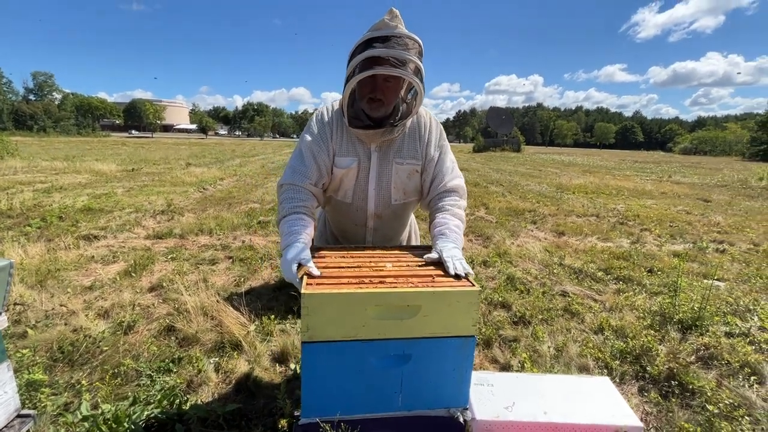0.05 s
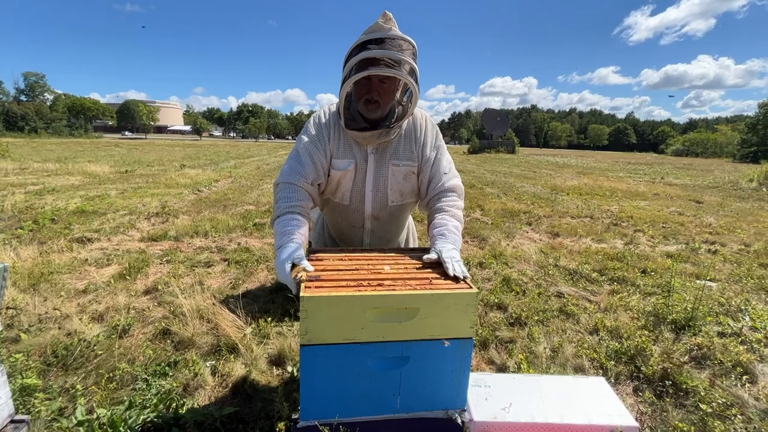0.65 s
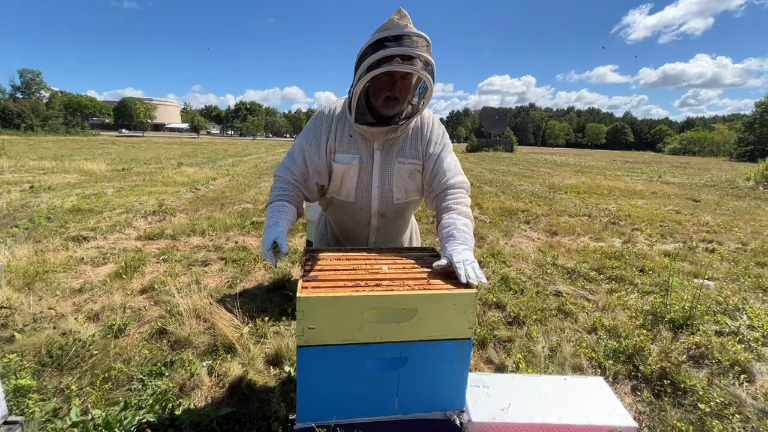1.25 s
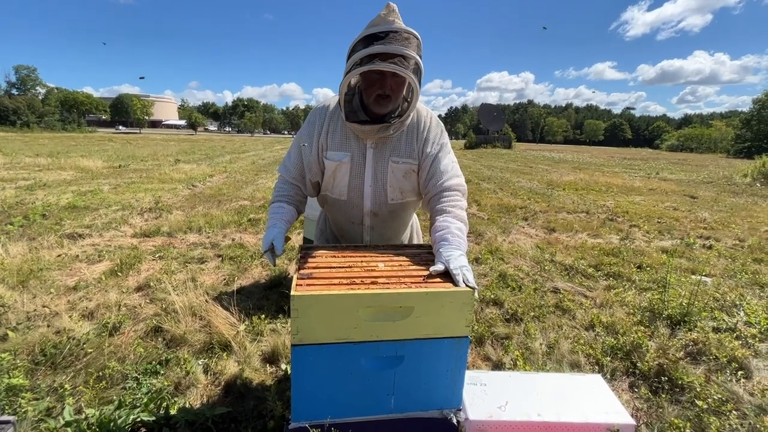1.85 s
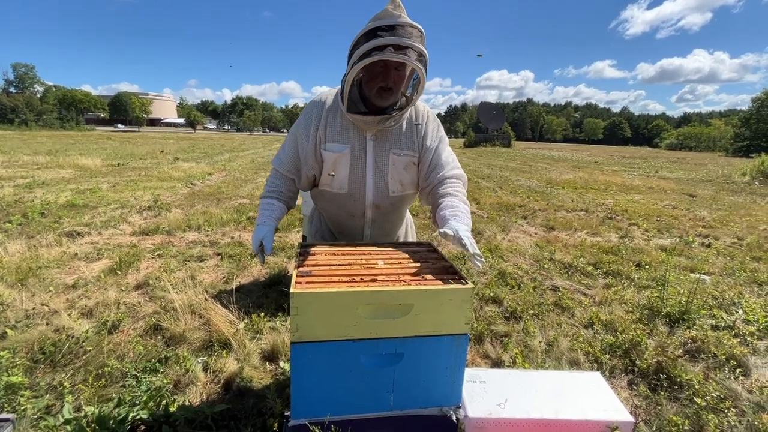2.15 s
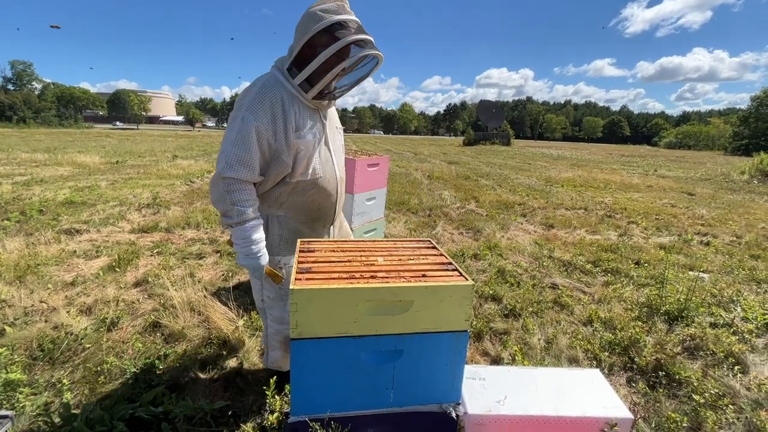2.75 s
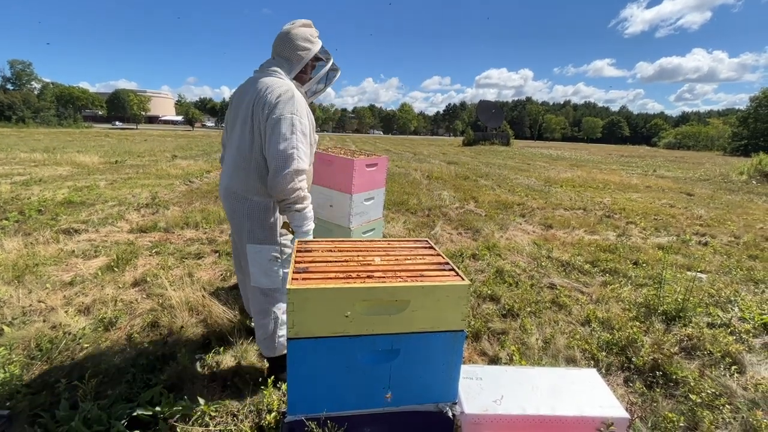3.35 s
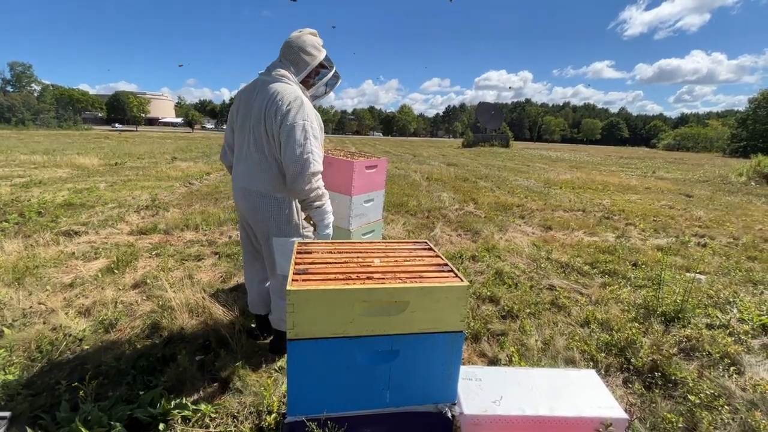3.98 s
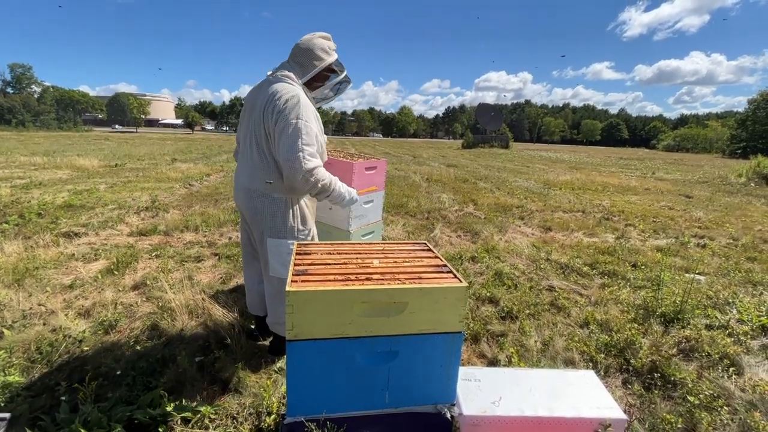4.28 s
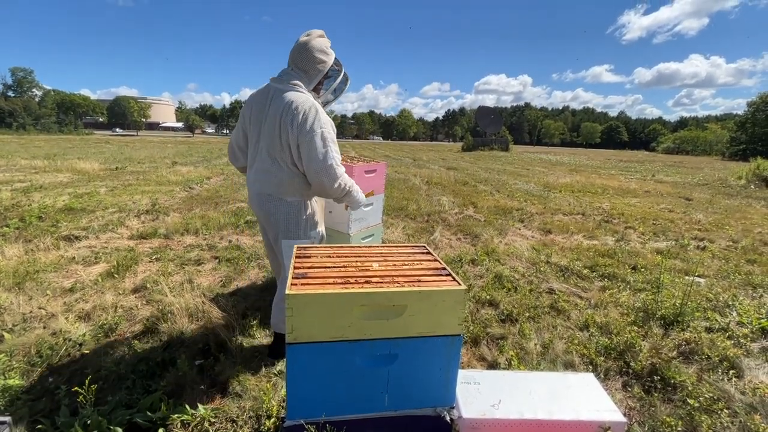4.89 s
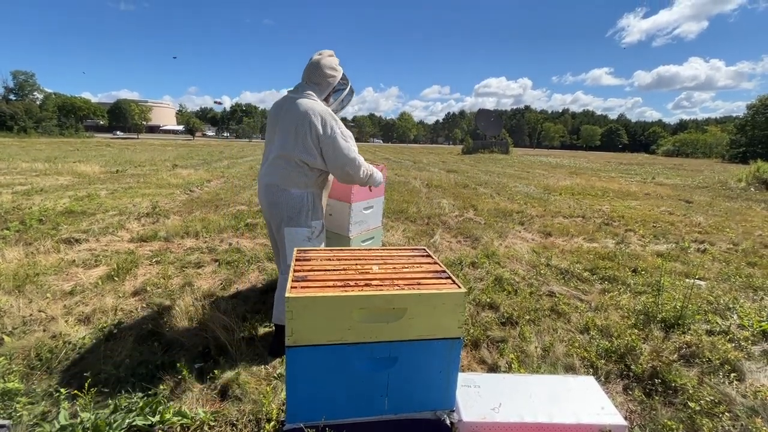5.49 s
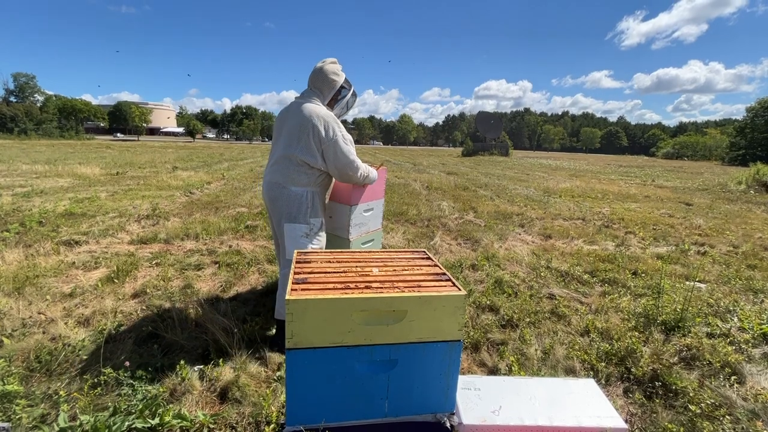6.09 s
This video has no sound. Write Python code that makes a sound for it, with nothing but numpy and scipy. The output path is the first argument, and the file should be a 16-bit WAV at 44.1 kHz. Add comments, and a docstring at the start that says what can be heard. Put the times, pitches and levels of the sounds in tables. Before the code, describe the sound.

In an open field, crickets chirp and trill over the low rumble of distant traffic and a faint hum of bees. Two soft wooden knocks come at the start. Past the middle, a heavy hive box clunks hard, briefly overloading the stereo microphone, and a lighter box bumps several times. A few faint dry scrapes follow, with cloth and grass rustling very quietly throughout.

```python
"""A summer hayfield beside open beehives. From the start far traffic rumbles and drones, crickets
scrape their wings in chirps and trills, bees hum and the beekeeper's suit rustles. Two soft knocks
ring a wooden hive box, stems snap, and a cicada's whine sinks and fades. The keeper walks through the
grass; a small bird chips while a heavy box is knocked, once hard enough to overload the two-port
microphone. A light box is knocked as a far truck nears and eases off, and a few dry scrapes follow."""
import sys
import numpy as np
from scipy import signal
from scipy.fft import rfft, irfft, next_fast_len
from scipy.io import wavfile
from scipy.ndimage import uniform_filter1d

SR = 44100
rng = np.random.default_rng(int(sys.argv[2]) if len(sys.argv) > 2 else 0)


def master(y):
    """Save y as 16-bit WAV."""
    cut = np.clip(np.atleast_2d(y).T, -1, 1)
    pcm = np.round(cut * 32767)  # scale
    wavfile.write(sys.argv[1], SR, pcm.astype(np.int16))


N = 274743
T = np.arange(N) / SR
PORT_LAG_S = 0.00046  # delay between the ports for a sound from one side

# spectrum of traffic and air over the field: frequency_hz, relative_db
AIR_SPECTRUM = [(15, -42), (25, -43), (43, -3), (96, -1.5), (118, -8.5), (140, -12), (209, -18),
                (292, -20.5), (332, -15.5), (427, -17.5), (561, -25), (1010, -23), (1330, -31), (1640, -32),
                (3800, -44.5), (4940, -57), (8360, -120)]
# two far engines at steady speed: pitch_hz, relative_db, fade_db_per_s
ENGINE_TONES = [(56.4, -2.5, 0.82), (106.2, -3, 1.5)]
# their joint envelope: time_s, level_db
ENGINE_ENVELOPE = [(0.0, -31), (0.25, -31), (0.44, -43), (1.8, -28), (1.86, -50), (2.11, -35.5),
                   (2.89, -27), (3.12, -33), (3.3, -27), (3.6, -28), (3.69, -37), (3.82, -28.5),
                   (4.6, -30.5), (5.6, -28)]
# blurred high cricket chorus, filtered off steeply above 9.1 kHz: frequency_hz, relative_db
CHORUS_FILTER = [(5000, -51), (7000, -21), (7700, -9.5), (8200, -9.5), (8550, -6.5), (8900, -6),
                 (9100, -7.5), (9300, -56), (10000, -70)]
# trilling ground crickets:
# stroke_rate_hz, rate_waver_share, pitch_hz, fall_share, sounding_share, level_db, pan_db, left_lag_s
TRILLS = [(19.3, .008, 8650, .05, .52, -51, 11, -0.0038), (17.72, .03, 8350, .15, .48, -53.5, 9.5, .00002),
          (16.92, .03, 8500, .06, .55, -54.5, -11, -.00003),
          (18.7, 0.0299, 8650, .07, .55, -55.5, -11, 0.009),
          (21.2, 0.0199, 8600, 0.043, 0.5, -51, 3, .00004)]
# partials of the cicada's whine: offset_hz, relative_db
CICADA_PARTIALS = [(-400, -4), (-205, -10), (-20.5, -2.5), (194.5, -5), (370, -4)]
# spectrum of rubbing cloth and dry grass: frequency_hz, relative_db
RUSTLE_SPECTRUM = [(1500, -10), (3000, -5), (6000, -3), (10000, 5), (11200, -3.5), (13300, 2), (14200, -5),
                   (14700, -45)]
# swishes of a sleeve or a boot: peak_s, half_length_s, level_db
SWISHES = [(0.48, 0.042, -55), (2.263, 0.052, -56), (2.801, .04, -57), (3.09, 0.035, -53), (3.56, .09, -56),
           (5.11, 0.041, -56)]
# chirps of the near, the far and the lower-pitched field crickets: time_s, level_db, first_stroke_db
NEAR_CHIRPS = [(0.0977, -35, 1), (0.4, -37.5, -8), (0.7529, -34.5, 0), (1.1758, -36.5, 0), (1.4013, -36, 2),
               (1.6701, -34.5, 0.5), (1.9504, -33, -1), (2.2648, -35, -1), (2.5525, -37, -2),
               (2.8575, -38, -7), (3.1024, -38, -3)]
FAR_CHIRPS = [(.2, -52.5, 0), (.785, -49, 0), (1.57, -50, -2), (2.01, -51, 0), (3.44, -54, 0),
              (3.775, -59, -2), (4.28, -58, 0.5), (4.74, -56, -1), (5.08, -54, -2), (5.39, -54, 0),
              (5.57, -58, 0), (5.785, -51.5, 1), (6.06, -58, -2), (6.19, -49, -2)]
LOW_CHIRPS = [(0.4183, -35, 0), (1.0318, -33, 0.5), (1.7725, -34.5, 0), (2.456, -35, 0.5),
              (3.1257, -35, -3), (4.0435, -38, -5), (4.9944, -41, -10), (5.6144, -41, 2.5),
              (6.2058, -38, -1)]
# wing strokes within each of their chirps: offset_s, length_s, pitch_hz, fall_share, relative_db
NEAR_STROKES = [(-.039, 0.016, 5020, .06, -6), (-.012, 0.0245, 5300, 0.13, 0),
                (0.024, 0.0255, 5300, 0.13, 1)]
FAR_STROKES = [(-.03, .024, 5060, .04, -4), (.005, .026, 5130, .04, 1), (0.034, .026, 5150, .04, 1),
               (0.071, .026, 5150, .04, -5.5)]
LOW_STROKES = [(-.069, 0.022, 4350, 0.025, -6.5), (-.024, 0.035, 4520, 0.035, 0)]
# knocks on the hive boxes: start_s, level_db, brightness_hz, rocking_t60_s, box_name
KNOCKS = [(.098, -22, 150, .12, "light"), (.226, -25, 130, .1, "light"), (2.763, -21.5, 170, 0.3, "heavy"),
          (3.379, -17, 170, 0.2, "heavy"), (3.46, -22, 2500, 0.1, "heavy"),
          (3.4661, -1.5, 870, 0.25, "heavy"), (3.4708, -1.2, 775, 0.23, "heavy"),
          (3.4782, 6, 450, 0.15, "heavy"), (3.5099, -13.5, 165, 0.1, "heavy"),
          (3.5276, -9, 280, 0.1, "heavy"), (3.5555, -13.5, 138, 0.07, "heavy"),
          (3.603, -15, 143, .04, "heavy"), (3.6351, -19, 84, 0.3, "heavy"), (4.092, -27, 200, 0.3, "light"),
          (4.231, -13, 357, 0.4, "light"), (4.255, -13, 150, 0.23, "light"),
          (4.280, -17, 158, 0.1, "light"), (4.340, -20.5, 193, 0.48, "light"),
          (4.478, -18.5, 780, 0.37, "light"), (4.490, -15.5, 204, 0.3, "light")]
# normal modes of the heavy and the light box: frequency_hz, relative_db, t60_s
BOX_MODES = {"heavy": [(101.5, -4.5, 0.13), (129.5, -10, 0.21), (153, -12, 0.13), (202.2, 3.5, 0.14),
             (280, 5.5, 0.059), (377.5, -6.5, 0.058), (444, -4.5, 0.12), (530, -10.5, 0.072),
             (608, -6.5, .06), (679, -4, .055), (710, -5, 0.069), (842, -10, 0.06), (1120, -7, 0.061)],
             "light": [(128, -2.5, 0.14), (167, -4.5, .083), (202, 6, 0.096), (289, 0, 0.095),
             (381, -7, 0.076), (447, -0.3, .07), (500, -6, 0.054), (678, -4, 0.058)]}
# snaps and scrapes of stems and wood: start_s, level_db, centre_hz, width_octaves, t60_s
SNAPS = [(.509, -47, 13800, .35, .016), (.5145, -48, 13800, .35, .014), (2.763, -53, 5500, 1.5, .22),
         (3.461, -25.5, 880, 1.2, 0.1), (3.466, -39.5, 2950, 1.55, 0.12), (3.476, -23.5, 566, 1.6, 0.12),
         (3.478, -34, 2390, 2.3, 0.039), (3.531, -45.5, 2560, 1.4, 0.12), (4.0135, -47, 13800, .35, .018),
         (4.6, -53, 1800, 1.2, .3), (4.89, -54, 1800, 1.2, 0.44), (4.96, -46, 1640, .8, 0.24),
         (5.08, -52, 1700, 1.0, .3), (5.21, -53, 2010, 0.93, 0.56), (5.1, -56, 4500, 1.6, .28)]
# the bird's falling chips: start_s, length_s, pitch_hz, fall_share, level_db
BIRD_CHIPS = [(3.347, 0.041, 4000, 0.25, -56), (3.488, .034, 5320, 0.18, -52),
              (3.512, 0.035, 3650, 0.24, -55), (3.649, .04, 4040, 0.28, -58.5),
              (3.775, 0.037, 3970, 0.23, -57)]


def undb(db):
    """Amplitude ratio of a level in decibels."""
    return np.exp(np.asarray(db) * (np.log(10) / 20))


def level(x, db):
    """Normalisation to an rms level."""
    return x * undb(db) / np.sqrt(np.mean(x ** 2))


def sine(hz):
    """Oscillation whose phase is the integral of its frequency."""
    return np.sin(2 * np.pi * np.cumsum(hz) / SR)


def wander(rate_hz):
    """Smoothed random steps for slow or fast modulation, with a spread near 1."""
    hold = int(SR / rate_hz)
    steps = np.repeat(rng.standard_normal(N // hold + 1), hold)
    return 1.3 * uniform_filter1d(uniform_filter1d(steps, hold), hold)[:N]


def colour(x, points):
    """Spectral shaping by points of frequency_hz, gain_db."""
    hz, db = np.transpose(points)
    size = next_fast_len(N)
    bins_hz = np.fft.rfftfreq(size, 1 / SR)
    gain = undb(np.interp(np.log(bins_hz + 1), np.log(hz), db))
    return irfft(rfft(x, size) * gain, size)[..., :N]


def balance(pan_db):
    """Level difference: port gains with the left pan_db above the right."""
    return undb(np.array([[1], [-1]]) * pan_db / 2)


def place(x, pan_db, lag_s=0):
    """Direction as level and time differences: the left port hears the sound lag_s later."""
    return np.array([np.interp(T - lag_s, T, x), x]) * balance(pan_db)


def add(track, start_s, sound):
    """Superposition of a sound on a track."""
    i = max(int(start_s * SR), 0)
    track[..., i:i + sound.shape[-1]] += sound[..., :max(N - i, 0)]


def scatter(x, wet_db, t60_s):
    """Scattering by stems and ground gives a short diffuse tail, different at each port."""
    t = T[:SR // 4]
    tail = rng.standard_normal((2, len(t))) * undb(-60 * t / t60_s)
    tail /= np.linalg.norm(tail[0])
    return undb(wet_db) * signal.fftconvolve(x[None], tail, axes=1)[:, :N]


def air(level_db=-33, swell_db=0.62, fade_db_per_s=0.2262):
    """Direct and diffuse fields: receding traffic rumbles on the right; its treble flickers all round."""
    road = place(rng.standard_normal(N), pan_db=-1, lag_s=PORT_LAG_S)
    road = colour(road, [(40, -7.5), (110, -3.5), (180, -1), (600, -2), (1500, -3), (3500, -26)])
    flicker = undb(.7 * wander(20))
    diffuse = rng.standard_normal((2, N)) * balance(4) * flicker
    diffuse = colour(diffuse, [(50, -6), (100, -10), (250, -10), (900, -1), (3500, 0)])
    rumble = level(colour(road + diffuse, AIR_SPECTRUM), level_db)
    return rumble * undb(swell_db * wander(3.16) - fade_db_per_s * T)


def exhaust(hz, db, flutter_db=1.5, waver_share=0.0119):
    """Periodic firing makes a tone, modulated by the moving air on its long path."""
    amplitude = np.sqrt(2) * undb(db + flutter_db * wander(9))
    return amplitude * sine(hz * (1 + waver_share * wander(10)))


def engines():
    """Common amplitude modulation: two drones swell and dip together, fading as they move off."""
    hum_db = np.interp(T, *np.transpose(ENGINE_ENVELOPE))
    return sum(exhaust(hz, hum_db + db - fade * T) for hz, db, fade in ENGINE_TONES)


def meadow(level_db=-56.5, pan_db=5, swell_db=1.55):
    """Incoherent sources, distant insects and leaves, sum to a smooth hiss."""
    spectrum = [(1500, -6), (3000, 5.5), (5000, 19.5), (7200, 7.5), (9000, -9), (11000, -28)]
    hiss = level(colour(rng.standard_normal((2, N)), spectrum), level_db)
    return hiss * undb(swell_db * wander(3)) * balance(pan_db)


def ground_crickets(chorus_db=-47, rough_hz=80, waver_hz=80, fade_db_per_s=0.29):
    """Continuous stridulation: trains of falling wing strokes waver over a blurred, filtered chorus."""
    out = level(colour(rng.standard_normal((2, N)), CHORUS_FILTER), chorus_db) * balance(3)
    for rate_hz, unsteady, hz, fall, sounding, db, pan_db, lag_s in TRILLS:
        cycles = np.cumsum(rate_hz * (1 + unsteady * wander(4))) / SR
        progress = np.minimum(cycles % 1 / sounding, 1)
        pitch = hz * (1 - fall * progress ** 2.8) + rough_hz * wander(900) + waver_hz * wander(25)
        trill = np.sin(np.pi * progress ** 1.33) * sine(pitch)
        flutter_db = 0.6 * wander(11) + 1.1 * wander(250)
        trill = level(trill * undb(flutter_db), db)
        out += place(trill, pan_db, lag_s) + scatter(trill, wet_db=-9, t60_s=0.26)
    return out * undb(-fade_db_per_s * (T - T.mean()))


def since(time_s):
    """Seconds elapsed after time_s, zero before it."""
    return np.maximum(T - time_s, 0)


def cicada(pitch_hz=6830, level_db=-57, sag_hz_per_s=330, fray_hz_per_s=110, fade_db_per_s=9):
    """Random frequency modulation broadens a far whine, which sinks, frays and fades as it runs down."""
    sinking_s = since(.55)
    hz = pitch_hz - sag_hz_per_s * sinking_s
    rough_hz = 55 + fray_hz_per_s * sinking_s
    whine = 0
    for offset_hz, db in CICADA_PARTIALS:
        whine += undb(db + 1.7 * wander(89.6)) * sine(hz + offset_hz + rough_hz * wander(400))
    return place(level(whine, level_db) * undb(-fade_db_per_s * since(0.69)), pan_db=4)


def bees(count=7, wing_hz=215, level_db=-47, slope_db_per_octave=-7):
    """Periodic wingbeats give each bee a wavering harmonic series that swells as it flies nearer."""
    cycle = np.linspace(0, 1, 256)
    wingbeat = sum(undb(slope_db_per_octave * np.log2(k)) * np.sin(2 * np.pi * k * cycle)
                   for k in range(1, 10))
    out = 0
    for offset, side in zip(np.linspace(-1, 1, count), rng.standard_normal(count)):
        hz = wing_hz * (1 + .12 * offset + .025 * wander(3) + 0.01002 * wander(25))
        buzz = np.interp(np.cumsum(hz) / SR % 1, cycle, wingbeat) * undb(3 * wander(3.07))
        out += place(buzz, 3 * side, PORT_LAG_S * side)
    return level(out, level_db)


def rustle(rest_db=-63, walk_db=-58.5, walk_from_s=1.8, walk_to_s=5.46, ramp_s=0.61, grain_db=3):
    """Friction of cloth and dry stems makes a fine crackle; walking and swishes add in power."""
    walking = np.clip(np.minimum(T - walk_from_s, walk_to_s - T) / ramp_s + .5, 0, 1)
    power = undb(rest_db + (walk_db - rest_db) * walking + 1.2 * wander(8.2)) ** 2
    for peak_s, half_s, db in SWISHES:
        power += undb(db) ** 2 * np.exp(-((T - peak_s) / half_s) ** 2)
    crackle = rng.standard_normal(N) * undb(grain_db * wander(700))
    diffuse = 0.88 * rng.standard_normal((2, N))
    return level(colour(crackle + diffuse, RUSTLE_SPECTRUM), 0) * np.sqrt(power)


def glide(length_s, hz, fall, bend=3.83, swell=1.9, rise=0.047):
    """A frequency-modulated note that swells and stops; rise and fall are shares of its pitch."""
    progress = np.linspace(0, 1, int(length_s * SR))
    pitch = hz * (1 - rise * (1 - progress) ** 4 - fall * progress ** bend)
    envelope = np.abs(np.sin(np.pi * progress ** swell)) ** .7
    return envelope * sine(pitch)


def field_cricket(chirps, strokes, pan_db, wet_db, rough_db, lag_s=0, judder=0, judder_hz=110):
    """Stridulation: a scraper crosses the wing's file, catches unevenly, may judder, and slows."""
    out = np.zeros(N)
    for time_s, chirp_db, first_db in chirps:
        for k, (offset_s, length_s, hz, fall, stroke_db) in enumerate(strokes):
            force, detune = rng.standard_normal(2)
            gain = undb(chirp_db + stroke_db + first_db * (k == 0) + 0.61 * force)
            add(out, time_s + offset_s, gain * glide(length_s, hz * (1 + 0.0025 * detune), fall))
    out *= 1 + judder * sine(judder_hz * (1 + .25 * wander(100)))
    out *= undb(rough_db * wander(350))
    return (place(out, 0, lag_s) + scatter(out, wet_db, t60_s=0.15)) * balance(pan_db)


def contacts(count=6, first_gap_s=.026, gap_share=0.95, soften_share=0.88, jitter_s=.001, floor_db=-32):
    """Inelastic rebound: a knocked box rocks in ever quicker, weaker and softer contacts."""
    k = np.arange(count)
    rows = []
    for start_s, db, bright_hz, t60_s, box in KNOCKS:
        gaps_s = first_gap_s * gap_share ** k + jitter_s * rng.standard_normal(count)
        after_s = np.cumsum(gaps_s) - gaps_s
        levels_db = db - 60 * after_s / t60_s
        rows += zip(start_s + after_s, levels_db, bright_hz * soften_share ** k, [box] * count)
    return [row for row in rows if row[1] > floor_db]


def hive_boxes(rattle_db=-17, rattle_t60_s=0.31, crack_db=-39, crack_t60_s=0.3, vary_db=1.5):
    """Modal resonance: each contact rings a box; loose frames rattle and the wood cracks faintly."""
    t = T[:SR // 3]
    radiation = signal.butter(4, 82, "high", fs=SR, output="sos")  # small walls radiate no deep bass
    dulling = signal.butter(1, 1500, fs=SR, output="sos")
    out = np.zeros(N)
    for start_s, db, bright_hz, box in contacts():
        rattle, crack, mode_mix = rng.standard_normal((3, len(t)))
        ring = sum(undb(mode_db + vary_db * chance - 60 * t / t60_s) * np.sin(2 * np.pi * hz * t)
                   for (hz, mode_db, t60_s), chance in zip(BOX_MODES[box], mode_mix))
        push = t * np.exp(-2 * np.pi * bright_hz * t)  # a softer contact pushes for longer
        rattle *= undb(-60 * t / rattle_t60_s)
        rattle /= np.linalg.norm(rattle)
        force = push + undb(rattle_db) * signal.fftconvolve(push, rattle)[:len(t)]
        body = signal.fftconvolve(force, signal.sosfilt(radiation, ring))[:len(t)]
        crack = signal.sosfilt(dulling, crack) * undb(crack_db - 60 * t / crack_t60_s)
        add(out, start_s, undb(db) * (body / np.abs(body).max() + crack))
    return place(out, pan_db=-0.6, lag_s=0.0005)


def snaps():
    """Damped transients: stems and wood give bursts of band noise, from crisp ticks to broad scrapes."""
    t = T[:SR // 5]
    out = np.zeros(N)
    for start_s, db, hz, octaves, t60_s in SNAPS:
        edge_ratio = 2 ** (octaves / 2)
        edges_hz = [hz / edge_ratio, min(hz * edge_ratio, SR * .4)]
        band = signal.butter(4, edges_hz, "band", fs=SR, output="sos")
        noise = signal.sosfilt(band, rng.standard_normal(len(t)))
        add(out, start_s, level(noise, db) * undb(-60 * t / t60_s))
    return place(out, pan_db=2)


def bird():
    """Downward frequency sweeps: quick, rough chips from overhead, with their scattered sound."""
    out = np.zeros(N)
    for start_s, length_s, hz, fall, db in BIRD_CHIPS:
        add(out, start_s, undb(db) * glide(length_s, hz, fall, bend=0.94, swell=0.94, rise=0))
    out *= undb(3.3 * wander(500))
    return place(out, pan_db=6) + scatter(out, wet_db=1, t60_s=0.07)


def truck(fast_hz=46.9, slow_hz=40.3, ease_at_s=4.4, ease_s=0.16, nearest_s=4.46):
    """Pitch follows firing rate, level follows distance: a truck nears, eases off and leaves."""
    hz = slow_hz + (fast_hz - slow_hz) * (1 - np.tanh((T - ease_at_s) / ease_s)) / 2
    away_db = 10 * np.maximum(nearest_s - T, 0) + 5 * since(nearest_s)
    return exhaust(hz, -38 - away_db) + exhaust(2 * hz, -34.5 - away_db)


def scene():
    """Superposition of every source in the field at the two ports."""
    near = field_cricket(NEAR_CHIRPS, NEAR_STROKES, pan_db=7, wet_db=-12, rough_db=1.5)
    low = field_cricket(LOW_CHIRPS, LOW_STROKES, pan_db=-3, wet_db=-16, rough_db=3,
                        lag_s=.00007, judder=.45)
    far = field_cricket(FAR_CHIRPS, FAR_STROKES, pan_db=12.5, wet_db=-7, rough_db=3)
    wildlife = near + low + far + ground_crickets() + cicada() + bees() + bird()
    traffic = place(engines() + truck(), pan_db=-2.5, lag_s=PORT_LAG_S) + air()
    return wildlife + traffic + meadow() + rustle() + snaps() + hive_boxes()


def record(dry):
    """Saturation flattens the loudest peak at full scale; a low-pass filter then cuts the top."""
    saturated = dry / (1 + dry ** 8) ** (1 / 8)
    low_pass = signal.ellip(8, .2, 70, 15700, fs=SR, output="sos")
    return signal.sosfilt(low_pass, saturated)


dry = scene()
out = record(dry)
master(out)
```